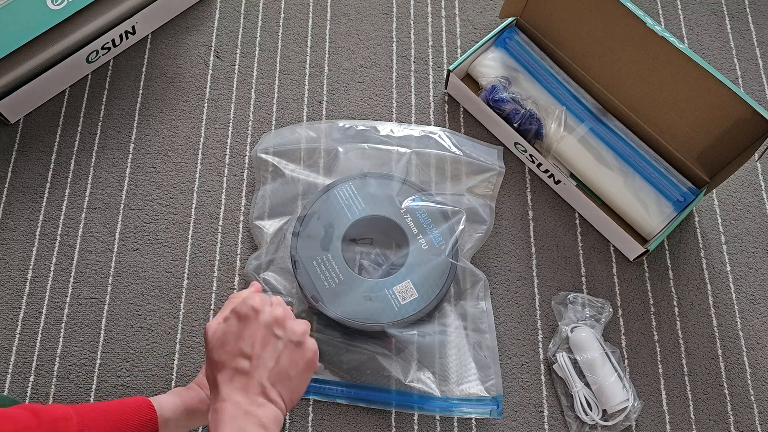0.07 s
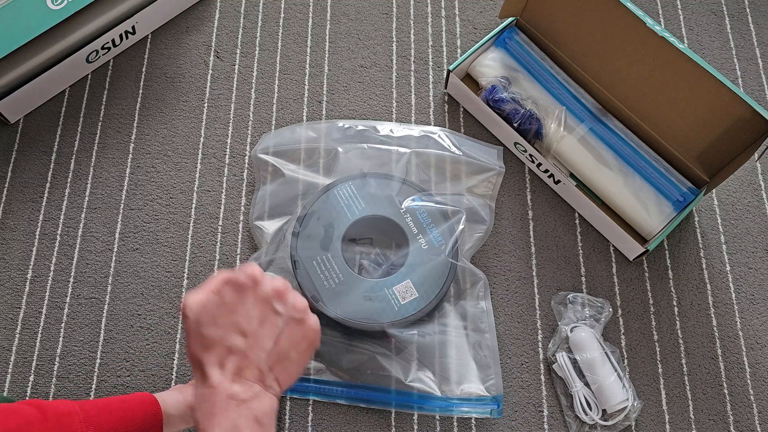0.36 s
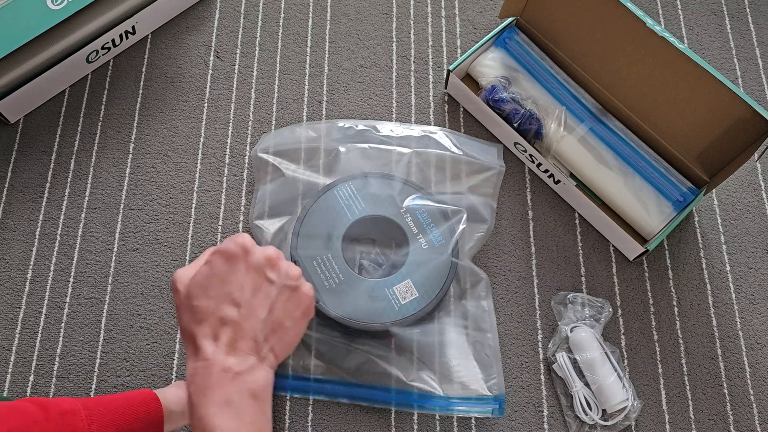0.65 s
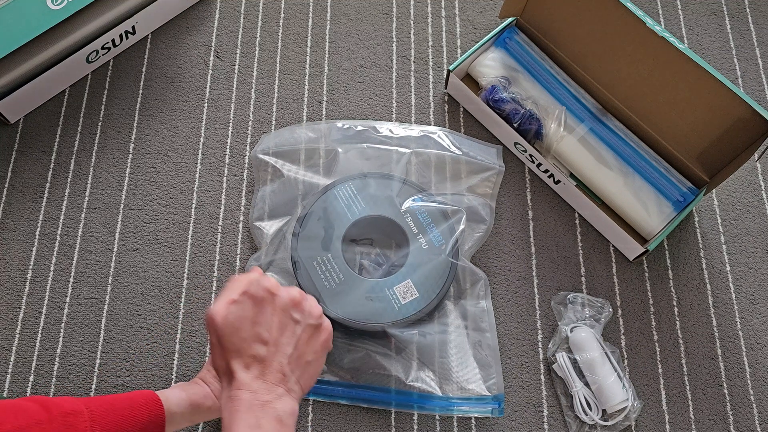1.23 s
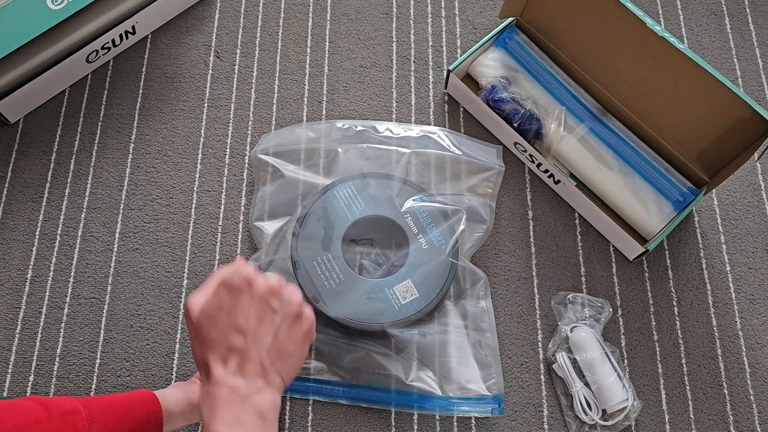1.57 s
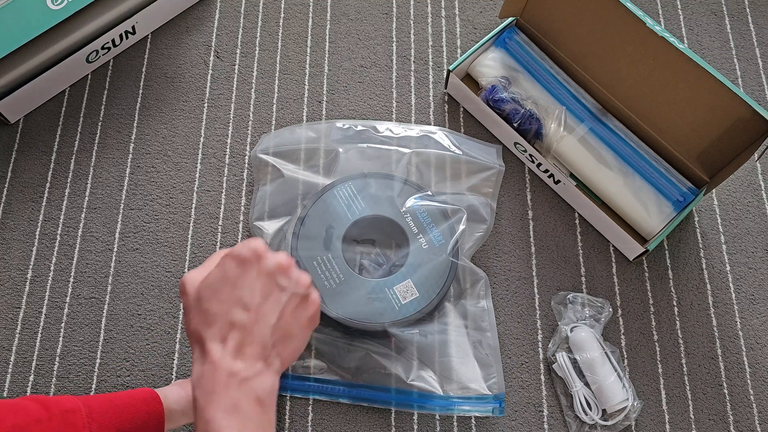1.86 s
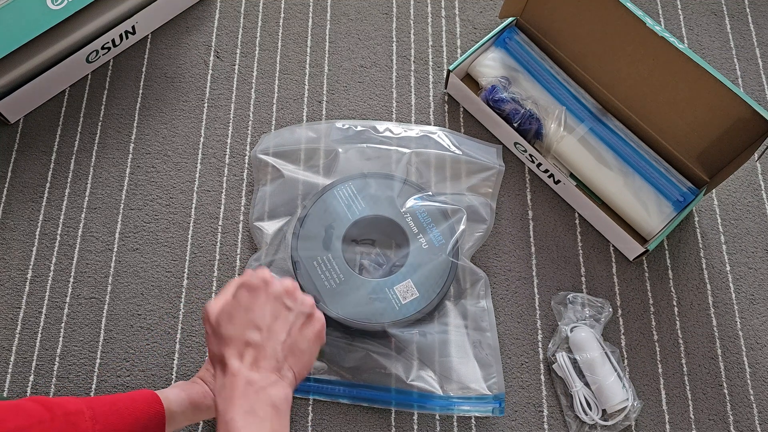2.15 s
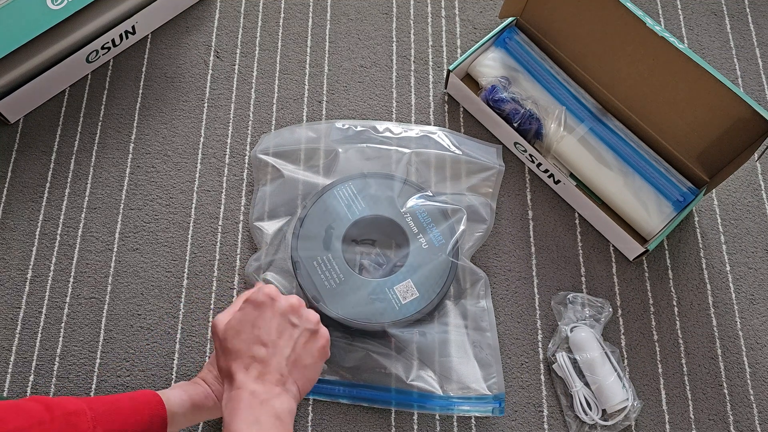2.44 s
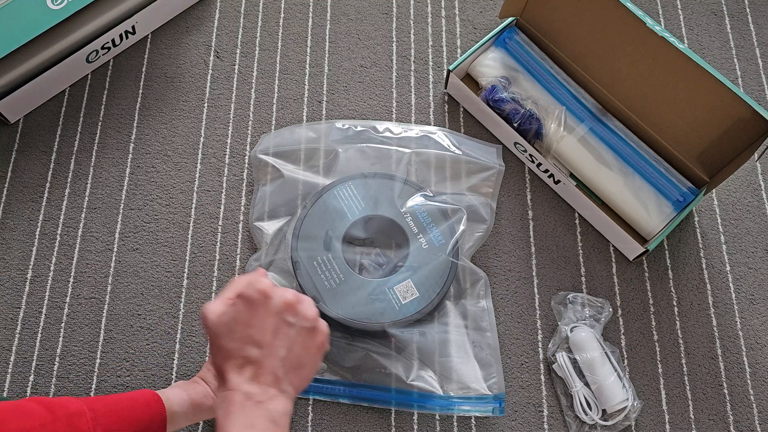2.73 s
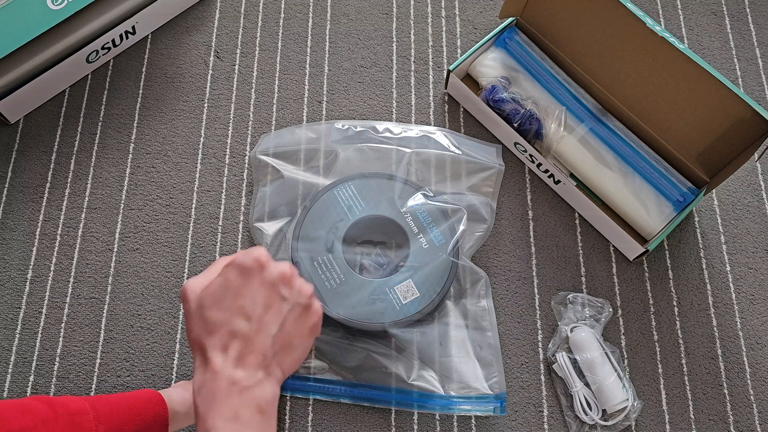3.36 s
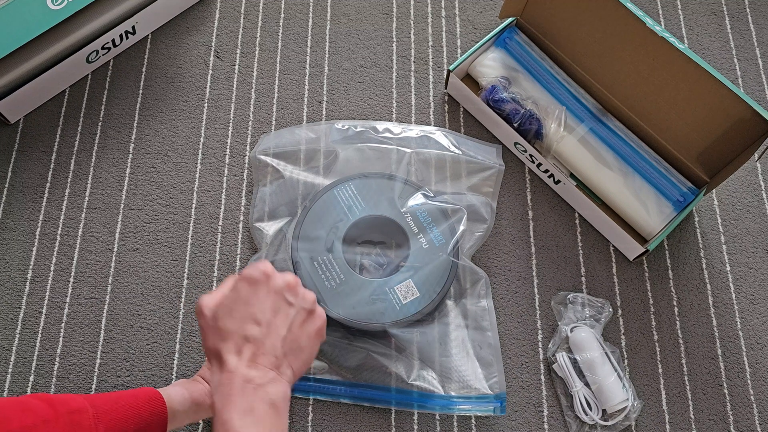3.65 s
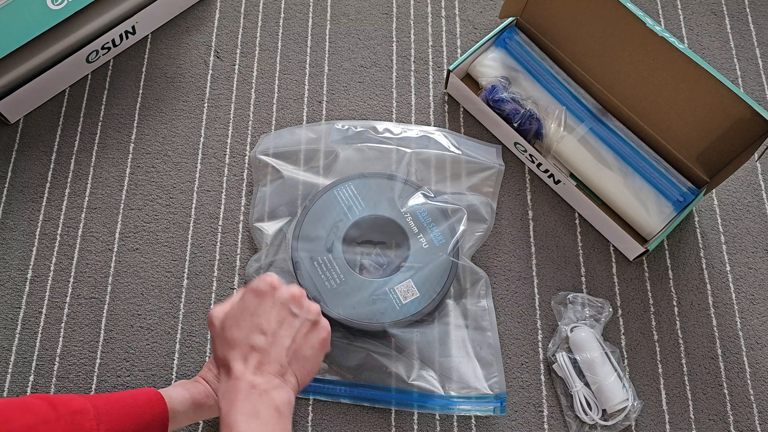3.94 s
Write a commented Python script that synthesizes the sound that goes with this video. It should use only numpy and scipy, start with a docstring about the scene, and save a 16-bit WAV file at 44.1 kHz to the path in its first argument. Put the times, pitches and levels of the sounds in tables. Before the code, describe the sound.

Rhythmic airy strokes of a small hand vacuum pump, clicking and knocking in a room.

```python
"""A plastic hand pump draws the air out of a storage bag on a carpet, about three strokes a second.
It opens on a push: air hisses through the lengthening barrel, the seal swishes, the bag crumples,
and the piston knocks at the end of its travel, with a thin squeal. Then the pull whistles through the
ticking valve, and the plastic snaps. After the first second the bag and the squeals fall silent;
the strokes carry on to the end, each ringing briefly in the small room."""
import sys
import numpy as np
from scipy import signal
from scipy.fft import rfft, irfft
from scipy.io import wavfile
from scipy.ndimage import uniform_filter1d

SR = 44100
rng = np.random.default_rng(int(sys.argv[2]) if len(sys.argv) > 2 else 0)


def store_wav(level_fs):
    """Save 16-bit WAV to argv[1]."""
    pcm = np.round(np.clip(np.atleast_2d(level_fs), -1, 1) * 32767)
    wavfile.write(sys.argv[1], SR, pcm.T.astype(np.int16))


N = 176400
T = np.arange(N) / SR


def from_db(db):
    """Decibels to gain."""
    return 10 ** (np.asarray(db) / 20)


def at_hz(points, hz):
    """Read a curve on a log-frequency axis."""
    freqs, values = np.transpose(points)
    return np.interp(np.log(hz + 1), np.log(freqs), values)


def noise(spectrum):
    """Coloured noise of rms 1."""
    eq = from_db(at_hz(spectrum, np.fft.rfftfreq(N, 1 / SR)))
    x = irfft(rfft(rng.standard_normal(N)) * eq, N)
    return x / x.std()


def highs(x, hz):
    """A gentle high-pass."""
    return signal.sosfilt(signal.butter(1, hz, "high", fs=SR, output="sos"), x)


def impulses(times, db):
    """One impulse per event."""
    x = np.zeros(N)
    x[np.clip((times * SR).astype(int), 0, N - 1)] = from_db(db)
    return x + 1e-18


def swell(u):
    """An envelope that peaks at u = 1 and dies away."""
    return u * np.exp(1 - u)


def burst(times, db, spectrum, attack_s):
    """Short noise bursts that peak after attack_s and die away."""
    r = np.exp(-1 / (attack_s * SR))
    envelope = signal.lfilter([0, np.e / (attack_s * SR)], [1, -2 * r, r * r], impulses(times, db))
    return envelope * noise(spectrum)


def strike(times, db, modes):
    """Soft blows on damped modes, each slightly detuned."""
    out, t = np.zeros(N + SR), T[:SR // 8]
    detunes = 1 + .025 * rng.standard_normal((len(times), len(modes)))
    for start, level_db, detune in zip(times, db, detunes):
        i = int(start * SR)
        for (hz, mode_db, attack_s), ratio in zip(modes, detune):
            tone = np.sin(2 * np.pi * hz * ratio * t)
            out[i:i + len(t)] += from_db(level_db + mode_db) * swell(t / attack_s) * tone
    return out[:N]


def gliding(hz, width_hz):
    """Air noise in a narrow resonance whose centre moves."""
    r = np.exp(-np.pi * width_hz / SR)
    sway = signal.lfilter([np.sqrt(1 - r * r)], [1, -r], rng.standard_normal((2, N)))
    sway = signal.sosfilt(signal.butter(1, 2 * width_hz, fs=SR, output="sos"), sway)
    phase = 2 * np.pi * np.cumsum(hz) / SR
    return sway[0] * np.cos(phase) + sway[1] * np.sin(phase)


def flutter():
    """Fast, uneven flutter of the air stream; rms 1."""
    x = uniform_filter1d(rng.standard_normal(N), int(.002 * SR))
    return x / x.std()


# stereo image of the room: (frequency [Hz], left-right correlation [0-1])
LIKENESS = [(60, 0.27), (200, 0.9), (400, 0.73), (800, 0), (1600, 0), (16000, 0)]
def widen(mid, side, hz):
    """Two noises become left and right, narrow in the low mids and wide on top."""
    alike = np.clip(at_hz(LIKENESS, hz), 0, 1)
    mid, side = np.sqrt(1 + alike) * mid, np.sqrt(1 - alike) * side
    return np.array([mid + side, mid - side]) / np.sqrt(2)


# room tone EQ: (frequency [Hz], level [dB])
ROOM_TONE_EQ = [(25, 27), (65, 22), (120, -3), (250, 5.5), (500, -43), (1500, -54), (16000, -102)]
def room_tone():
    """A faint, low bed, close to the centre."""
    return from_db(-54.5) * widen(noise(ROOM_TONE_EQ), noise(ROOM_TONE_EQ), hz=290)


# seal friction EQ: (frequency [Hz], level [dB])
RUB_EQ = [(200, -31), (900, 8), (1500, -6), (2200, 15.5), (3200, -38), (4400, 9), (5500, 5), (7000, -2),
          (11500, 1), (12500, -15), (16000, -18)]
def seal_rub():
    """The seal rubs softly under all the strokes, after a quick fade-in."""
    return from_db(-61) * noise(RUB_EQ) * np.minimum(T / 0.031, 1)


# push cues: (end [s], length [s], hiss level [dB], barrel resonance level [dB])
PUSHES = [(0.17, 0.18, -39, -55), (0.474, 0.12, -52, -48), (0.744, 0.15, -45.5, -51.5),
          (0.986, .11, -44.5, -58), (1.41, 0.18, -47.5, -54), (1.755, 0.15, -45.5, -57),
          (2.171, 0.21, -53, -57.5), (2.518, 0.17, -46, -64), (2.89, 0.17, -51, -61.5),
          (3.273, 0.15, -43, -58), (3.632, 0.15, -45, -61.5), (3.978, 0.16, -47.5, -66.5)]
# piston hiss EQ: (frequency [Hz], level [dB])
PUSH_EQ = [(300, 14.5), (900, 14), (1600, -11), (3000, -35), (4500, 6.5), (6500, 6), (9000, -4.5),
           (11500, 6), (12500, 2.5), (16000, -7)]
# air column resonances: (multiple of the lowest, level [dB], width [Hz])
BARREL_MODES = [(1, -1, 80), (3, 6, 70), (5, 2, 110), (7, 1, 150), (9, -3, 200)]
def pushes(start_hz=1750, end_hz=730, skew=2.27):
    """Air hisses past the piston; the barrel's odd resonances fall as its air column lengthens."""
    hiss, barrel, travel = np.zeros((3, N))
    for end, length, hiss_db, barrel_db in PUSHES:
        u = np.clip((T - end) / length + 1, 0, 1)
        speed = np.abs(np.sin(np.pi * u ** skew))  # peaks late in the stroke
        hiss += from_db(hiss_db) * speed
        barrel += from_db(barrel_db) * speed
        travel += u ** 2 * (u < 1)
    hz = 1 / (1 / start_hz + travel * (1 / end_hz - 1 / start_hz))
    tones = sum(from_db(db) * gliding(multiple * hz, width) for multiple, db, width in BARREL_MODES)
    return hiss * noise(PUSH_EQ) + barrel * tones


# seal slide cues: (middle [s], length [s], level [dB])
SWISHES = [(0.056, 0.11, -51.5), (.47, 0.09, -49), (0.764, 0.07, -43.5), (1.236, 0.19, -53),
           (1.95, 0.12, -50), (2.114, 0.076, -52), (2.391, 0.083, -51.5), (2.751, 0.27, -57.5),
           (3.095, 0.15, -57.5), (3.489, 0.12, -51.5), (3.843, 0.18, -54)]
# swish EQ: (frequency [Hz], level [dB])
SWISH_EQ = [(1500, -30), (4500, -2), (7000, 0), (11700, -0.5), (12600, -1), (16000, -7.5)]
def seal_swishes():
    """The seal slides along the barrel with a bright swish, loudest in mid-travel."""
    level = sum(from_db(db) * np.maximum(1 - (2 * (T - middle) / length) ** 2, 0)
                for middle, length, db in SWISHES)
    return level * noise(SWISH_EQ)


# bag cues: (time [s], attack [s], rumble level [dB], crinkle level [dB])
CRUMPLES = [(.06, 0.031, -39.5, -51), (0.151, 0.031, -34.5, -44.5), (0.498, 0.035, -37, -51.5),
            (0.733, 0.004, -29, -32), (.778, 0.0034, -25, -25.5), (0.795, 0.032, -38, -57)]
# EQs of the bag's low and mid layers: (frequency [Hz], level [dB])
RUMBLE_EQ = [(30, -9), (65, -3.5), (115, 8), (250, 4), (500, -6), (1000, -42), (4000, -68)]
CRINKLE_EQ = [(200, -19), (900, 5.5), (1600, 6), (3000, 2), (7000, -38), (16000, -44)]
def bag():
    """The bag rumbles and crinkles as the pump drags it on the carpet."""
    rumble, crinkle = np.zeros((2, N))
    for start, attack_s, rumble_db, crinkle_db in CRUMPLES:
        envelope = swell(np.maximum(T - start, 0) / attack_s)
        rumble += from_db(rumble_db) * envelope
        crinkle += from_db(crinkle_db) * envelope
    return rumble * noise(RUMBLE_EQ) + crinkle * noise(CRINKLE_EQ)


def clacks(times, db, start_hz, attack_s=.0021, fall_s=.0068):
    """The hollow middle of a knock: a pop of a few cycles whose pitch drops quickly."""
    out, t = np.zeros(N + SR), T[:SR // 50]
    envelope = swell(t / attack_s) ** 3
    for start, level_db, hz in zip(times, db, start_hz):
        i = int(start * SR)
        phase = 2 * np.pi * hz * fall_s * (1 - np.exp(-t / fall_s))
        out[i:i + len(t)] += from_db(level_db) * envelope * np.sin(phase)
    return out[:N]


# knock cues, with each layer's fader before its trim:
# (time [s], floor thud [dB], body thump [dB], clack [dB], crack [dB], clack's starting pitch [Hz])
KNOCKS = [(0.068, -25.5, -48, -42.5, -53, 890), (0.1264, -50, -23.5, -30.5, -19.5, 1860),
          (0.405, -42, -24.5, -33, -31.5, 1056), (0.503, -26, -29.5, -40, -37.5, 980),
          (0.57, -50, -29.5, -36.5, -38, 920), (0.7107, -49, -25.5, -27, -26.5, 1130),
          (0.735, -53, -59, -38.5, -40, 1340), (0.7833, -48, -34, -32.5, -33.5, 1974),
          (.787, -19, -47, -28, -62, 1150), (0.98, -60, -24, -34, -25, 1990),
          (1.1929, -55, -25.5, -38, -46, 1100), (1.298, -41, -39.5, -49, -45.5, 1040),
          (1.3823, -43, -23.5, -33, -24.5, 2012), (1.671, -47, -36.5, -44.5, -68, 1080),
          (1.7543, -58, -26, -33.5, -27, 1920), (1.9296, -55, -26.5, -28.5, -34.5, 1125),
          (2.051, -36, -39, -47.5, -44, 884), (2.159, -49, -28.5, -36, -35.5, 1700),
          (2.344, -45, -36, -66, -66, 909), (2.429, -35, -35.5, -48.5, -55, 1060),
          (2.5232, -45, -24.5, -32.5, -28, 1940), (2.69, -45, -26, -37, -61, 1136),
          (2.798, -40, -37, -52.5, -52, 990), (2.922, -38.5, -48, -47.5, -73, 710),
          (3.0539, -47, -28, -31.5, -61, 1206), (3.165, -39, -38, -45, -70, 1007),
          (3.245, -57, -22.5, -30, -24.5, 2016), (3.447, -57, -28.5, -44.5, -52, 1080),
          (3.536, -38, -39, -50.5, -75, 977), (3.635, -65, -30.5, -39.5, -38.5, 1800),
          (3.893, -36.5, -35.5, -47, -70, 1090)]
# weight of the pump body and the floor: (frequency [Hz], level [dB], attack [s])
BODY_MODES = [(181.2, -3.5, 0.0052), (226.3, 4.5, 0.0042), (286, -9, 0.0018)]
FLOOR_MODES = [(74, -14, 0.0092), (107.3, 0, 0.0054)]
# crack EQ: (frequency [Hz], level [dB])
CRACK_EQ = [(400, -16), (900, 6), (1400, -4.5), (2000, 5.5), (2800, 0.5), (4200, 4.5), (7000, -4),
            (10000, -17.5), (16000, -19)]
def knocks(crack_trim_db=2.5, clack_trim_db=9):
    """The piston hits its stops with a crack and a clack, and the pump thumps on the floor."""
    times, thud_db, thump_db, clack_db, crack_db, clack_hz = np.transpose(KNOCKS)
    thump = strike(times + 0.0012, thump_db, BODY_MODES)
    thud = strike(times, thud_db, FLOOR_MODES)
    crack = burst(times, crack_db + crack_trim_db, CRACK_EQ, attack_s=0.0016)
    clack = clacks(times, clack_db + clack_trim_db, clack_hz)
    return thump + thud + crack - clack


# room resonances: (frequency [Hz], level [dB], 60 dB decay [s])
ROOM_LOW_MODES = [(113.3, -16.5, 0.33), (176.1, -22, 0.53), (222.7, -17.5, 0.55), (286, -19, 0.37),
                  (366.6, -25, 0.69)]
ROOM_MID_MODES = [(464, -12.5, 0.35), (542, -9.5, 0.22), (678, -14.5, 0.26), (848, -7.5, 0.062),
                  (1017, -9, 0.11), (1283, -28.5, 0.31), (1475, -21, 0.24)]
PREDELAY_S = 0.00422
def room_boom():
    """Thumps set the room's low modes ringing, clacks its middle ones."""
    times, _, thump_db, clack_db, _, _ = np.transpose(KNOCKS)
    boom = np.zeros(N)
    for hit_db, modes in ((thump_db, ROOM_LOW_MODES), (clack_db, ROOM_MID_MODES)):
        hits = impulses(times + PREDELAY_S, hit_db)
        for hz, db, t60 in modes:
            r, w = from_db(-60 / (t60 * SR)), 2 * np.pi * hz / SR
            boom += from_db(db) * signal.lfilter([0, np.sin(w)], [1, -2 * r * np.cos(w), r * r], hits)
    return boom


# squeal cues: (start [s], end [s], starting pitch [Hz], final pitch [Hz], level [dB])
SQUEALS = [(.075, .135, 4000, 10400, -44), (.635, .72, 5500, 11500, -44)]
def seal_squeals():
    """On two early, hard pushes the seal squeals, climbing and growing until the piston stops."""
    level, hz = np.zeros((2, N))
    for start, end, low_hz, high_hz, db in SQUEALS:
        u = np.clip((T - start) / (end - start), 0, 1)
        rise = np.sin(np.pi / 2 * u) * (u < 1)
        level += from_db(db) * rise
        hz = np.where(rise > 0, low_hz + (high_hz - low_hz) * rise, hz)
    return level * gliding(hz, width_hz=120)


# valve air cues: (middle [s], length [s], top pitch [Hz], whistle level [dB], hiss level [dB])
RUSHES = [(0.334, 0.11, 6600, -53.5, -47), (0.50, .1, 10440, -55, -51), (0.942, .12, 7500, -52, -46.5),
          (1.138, .12, 7840, -53.5, -52), (1.523, .11, 7440, -54.5, -53.5), (1.731, .11, 7600, -53.5, -55),
          (1.895, .13, 8240, -50.5, -51), (2.103, 0.08, 6940, -56, -53.5), (2.282, .12, 7680, -48.5, -51.5),
          (2.497, 0.11, 7240, -57, -50), (2.639, .11, 8100, -50, -55), (3.024, .11, 8420, -51, -45.5),
          (3.227, .09, 8510, -51, -43), (3.388, .11, 7530, -53.5, -51), (3.749, .12, 8150, -50.5, -54.5)]
# whistle partials: (ratio to the pitch, level [dB])
WHISTLE_PARTIALS = [(1 / 3, -8), (1, 2), (5 / 3, -10)]
# valve hiss EQ: (frequency [Hz], level [dB])
PULL_EQ = [(300, -4), (900, 25), (1500, -46), (2200, 13), (3100, 11), (4400, -2), (5500, 3), (7200, 14),
           (9000, 6.5), (11500, 9), (12500, -6), (16000, -9)]
def valve_rushes(sag=.42, fade_db=9, waver=.007):
    """The valve hisses and the barrel's air column whistles; the pitch climbs to its top mid-stroke and falls
    again, fading as it turns down."""
    hiss, whistle, hz = np.zeros((3, N))
    for middle, length, top_hz, whistle_db, hiss_db in RUSHES:
        u = np.clip(2 * (T - middle) / length, -1, 1)
        speed = 1 - u ** 2
        hiss += from_db(hiss_db) * speed
        whistle += from_db(whistle_db - fade_db * np.maximum(u, 0)) * np.sqrt(speed)
        hz = np.where(speed > 0, top_hz * (1 - sag * (1 - speed)), hz)
    hz = hz * (1 + waver * flutter())
    tones = sum(from_db(db) * gliding(ratio * hz, width_hz=120) for ratio, db in WHISTLE_PARTIALS)
    return hiss * noise(PULL_EQ) + whistle * tones


# tick cues: (time [s], ring level [dB], click level before trim [dB])
TICKS = [(0.298, -47, -43.5), (0.3534, -36, -41), (0.644, -41.5, -40.5), (0.683, -35, -62),
         (0.903, -40, -43.5), (0.954, -34.5, -41), (1.095, -35.5, -41), (1.143, -42.5, -42),
         (1.305, -44.5, -56), (1.483, -45, -43.5), (1.533, -32.5, -39.5), (1.842, -36, -44),
         (1.8869, -32.5, -43), (2.064, -44, -45), (2.232, -46.5, -45.5), (2.282, -34.5, -43),
         (2.492, -34.5, -40), (2.595, -33.5, -44), (2.6417, -29.5, -35), (2.863, -37, -49.5),
         (2.965, -53, -47.5), (3.014, -34.5, -42.5), (3.2228, -34.5, -34.5), (3.34, -46, -43.5),
         (3.391, -33.5, -41), (3.597, -34, -39.5), (3.705, -43.5, -44.5), (3.752, -41.5, -44.5),
         (3.959, -43.5, -52)]
# ring of the flap: (frequency [Hz], level [dB], attack [s])
VALVE_MODES = [(2012, 8, 0.0012), (2387, 5, 0.0012), (804, -12, 0.0023)]
# click EQ: (frequency [Hz], level [dB])
CLICK_EQ = [(600, -23), (1200, 9), (3000, 15), (4400, 18.5), (5500, 12.5), (6800, 11), (10000, 0),
            (16000, -5)]
def valve_ticks(click_trim_db=8):
    """The valve flap clicks and rings."""
    times, ring_db, click_db = np.transpose(TICKS)
    ring = strike(times, ring_db, VALVE_MODES)
    return ring + burst(times, click_db + click_trim_db, CLICK_EQ, attack_s=0.0017)


# snap cues: (time [s], level [dB])
SNAPS = [(.407, -33), (.427, -16.5), (1.756, -24), (2.525, -27), (2.691, -32), (3.0555, -28)]
# snap EQ: (frequency [Hz], level [dB])
SNAP_EQ = [(800, 8), (2000, 2.5), (6500, -3.5), (8400, 7), (10000, -1), (16000, -6.5)]
def plastic_snaps():
    """Now and then the plastic gives a tight, bright snap."""
    times, db = np.transpose(SNAPS)
    return burst(times, db, SNAP_EQ, attack_s=.0005)


# early reflections: (delay [s], level [dB])
ECHOES = [(0.0214, -10), (0.0411, -11.5), (0.0695, -19)]
def echoes(x):
    """A few dull slaps from the ceiling and walls."""
    dull = x - highs(x, 850)
    return sum(from_db(db) * np.interp(T - delay_s, T, dull, left=0) for delay_s, db in ECHOES)


# reverb EQ: (frequency [Hz], level [dB])
REVERB_EQ = [(100, -22), (250, -17), (500, -7), (850, -5), (1300, -2), (2000, -2), (4000, 0), (8000, -.5),
             (16000, -2)]
# reverb length: (frequency [Hz], 60 dB decay [s])
REVERB_T60 = [(100, 0.63), (500, 0.43), (2000, 0.29), (5000, 0.33), (10000, 0.37), (16000, 0.22)]
def reverb(x):
    """The room's diffuse tail dies band by band."""
    t, edges = T[:SR // 2], np.geomspace(80, 18000, 17)
    white, tail = rng.standard_normal((2, 2, len(t))), 0
    for k, (low, high) in enumerate(zip(edges, edges[1:])):
        hz = np.sqrt(low * high)
        bandpass = signal.butter(2, [low, high], "band", fs=SR, output="sos")
        band = widen(*signal.sosfilt(bandpass, white[k % 2]), hz)
        tail = tail + band * from_db(at_hz(REVERB_EQ, hz) - 60 * t / at_hz(REVERB_T60, hz))
    tail *= np.clip(t / PREDELAY_S - 1, 0, 1)
    tail /= np.sqrt(np.mean(np.sum(tail ** 2, axis=1)))
    return signal.fftconvolve(x[None], tail, axes=1)[:, :N]


def moving_reverb(x, count=9, step_s=.05):
    """Hand and pump move, so the reflections keep changing: the send crossfades round several tails."""
    wet = 0
    for k in range(count):
        distance = np.abs((T / step_s - k) % count - count / 2)
        wet = wet + reverb(x * np.cos(np.pi / 2 * np.minimum(distance, 1)))
    return wet


def pan_left(x, shelf_db=2.46, shelf_hz=530, lag_samples=5):
    """The left side is brighter; the right is duller and slightly late."""
    left, right = (x + (from_db(db) - 1) * highs(x, shelf_hz) for db in (shelf_db, -shelf_db))
    return np.array([left, np.pad(right, (lag_samples, 0))[:N]])


def scene():
    """The mix: the pump a little to the left in a quiet room, knocks and bag wettest, air driest."""
    hits = knocks() + bag()
    ticks = valve_ticks() + plastic_snaps()
    air = seal_rub() + pushes() + valve_rushes() + seal_swishes()
    grit = from_db(2.5 * flutter())
    air = air * grit + seal_squeals()
    direct = pan_left(hits + ticks + air)
    send = from_db(-1) * hits + from_db(-3) * ticks + from_db(-4) * air
    return direct + room_tone() + echoes(hits) + moving_reverb(send) + room_boom()


def record(dry):
    """Master EQ: a soft low cut and a steep high cut."""
    low_cut = signal.butter(2, 59, "high", fs=SR, output="sos")
    high_cut = signal.ellip(10, .2, 80, 16100, fs=SR, output="sos")
    return signal.sosfilt(high_cut, signal.sosfilt(low_cut, dry))


dry = scene()
out = record(dry)
store_wav(out)
```